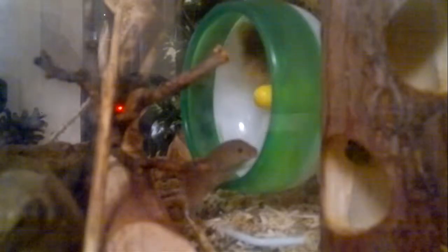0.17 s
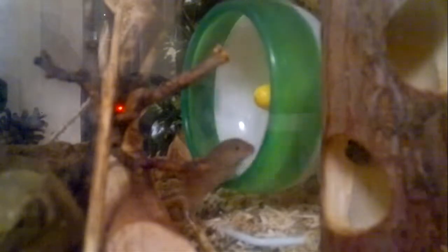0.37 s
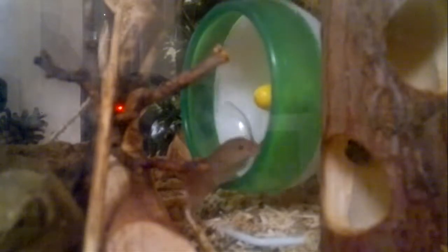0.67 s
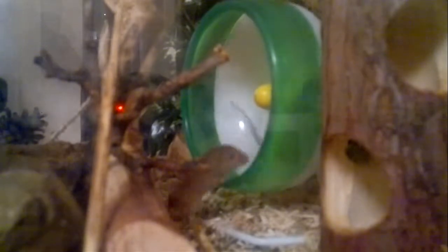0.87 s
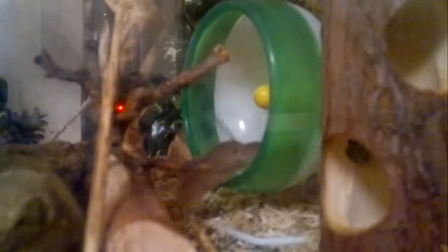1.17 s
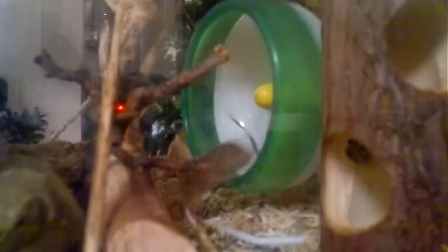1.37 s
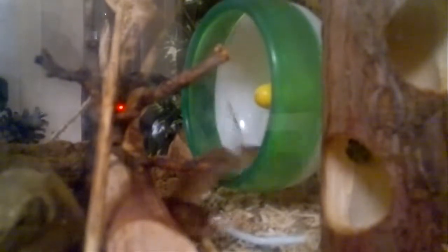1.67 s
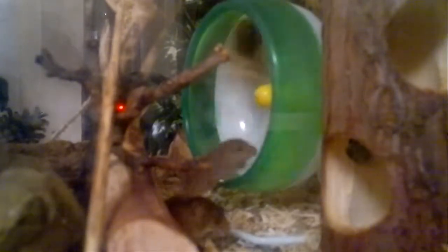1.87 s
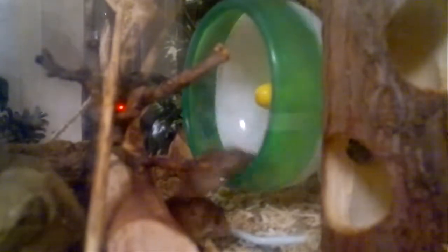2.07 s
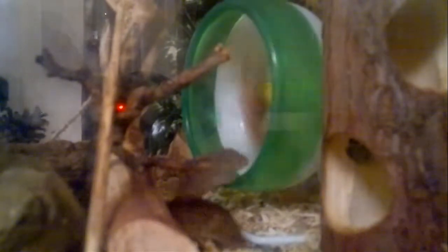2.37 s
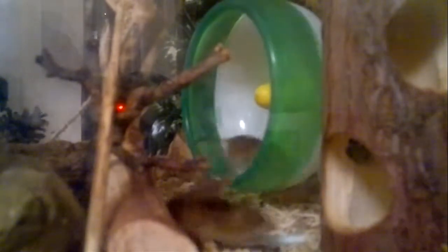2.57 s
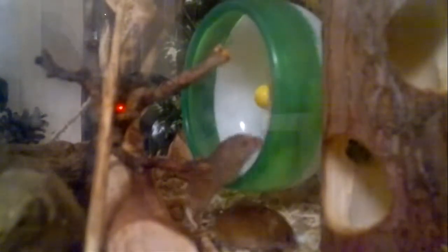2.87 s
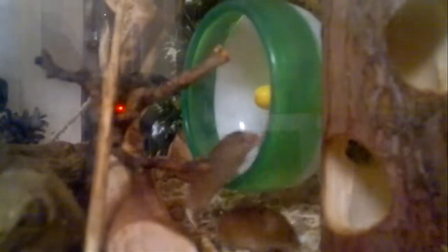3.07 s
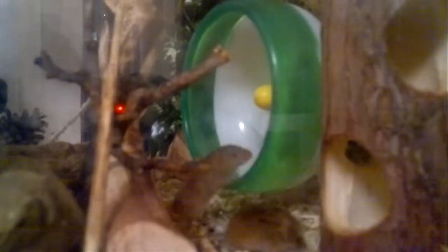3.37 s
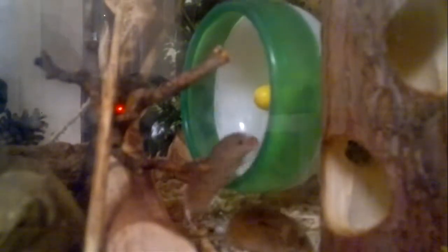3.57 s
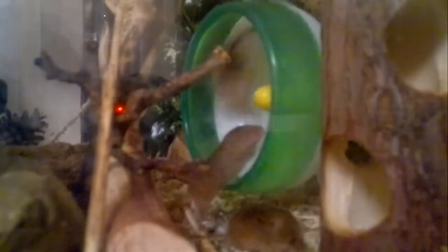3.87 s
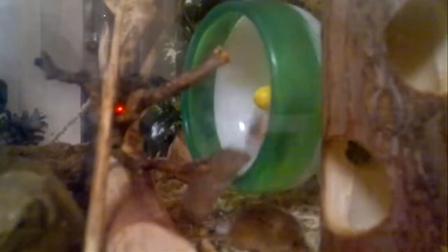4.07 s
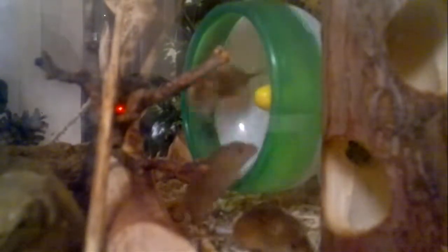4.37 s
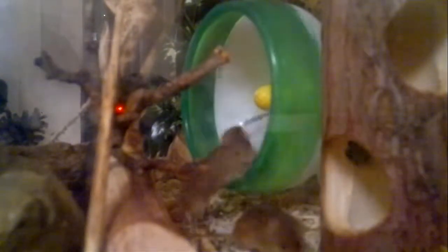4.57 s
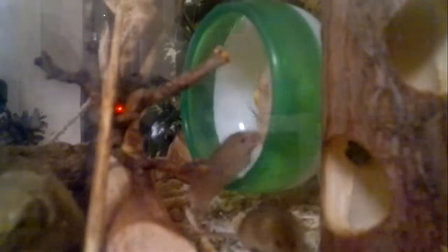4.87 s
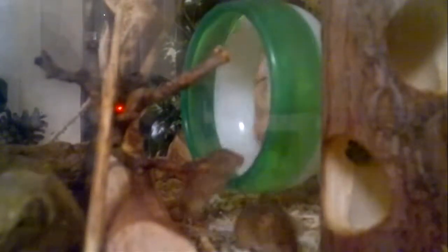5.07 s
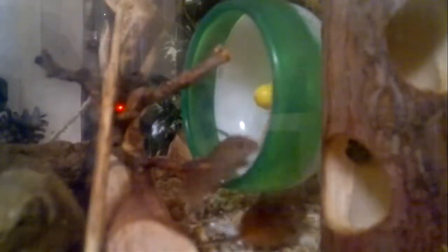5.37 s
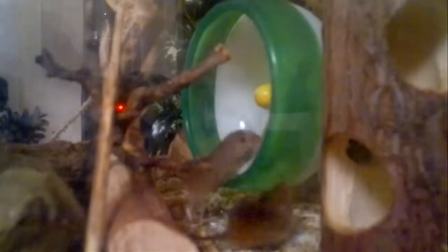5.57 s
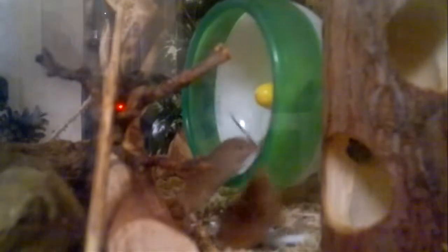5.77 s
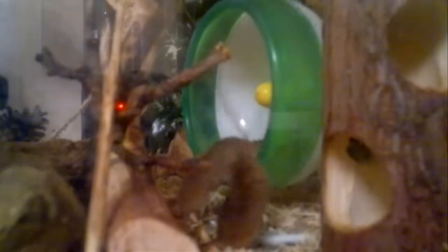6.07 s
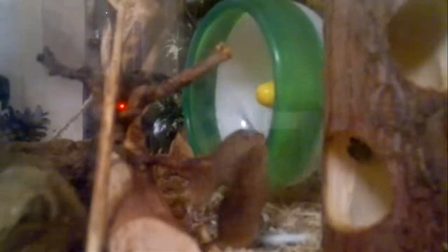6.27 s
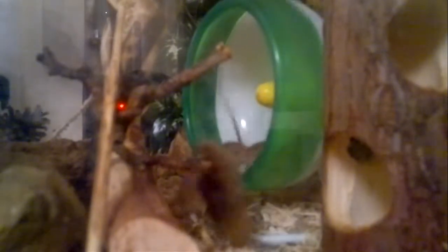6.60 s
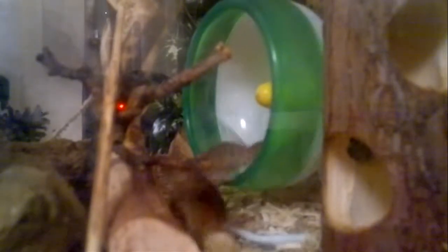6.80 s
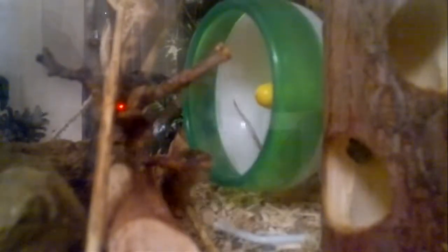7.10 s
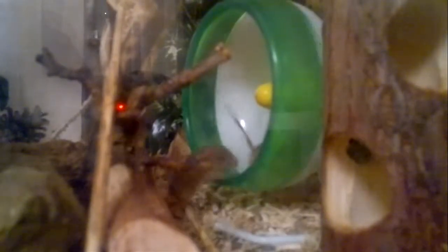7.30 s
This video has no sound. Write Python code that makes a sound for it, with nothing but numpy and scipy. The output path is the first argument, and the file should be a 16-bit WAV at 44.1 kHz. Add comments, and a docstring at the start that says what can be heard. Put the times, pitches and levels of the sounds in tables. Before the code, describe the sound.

A plastic exercise wheel knocks irregularly on its stand as mice scurry around a tank, with muffled patter, low rumble and faint hiss indoors.

```python
"""Mice scramble in and around a plastic exercise wheel in a glass tank, indoors.
Throughout: faint hiss with flickering treble, uneven low rumble, pattering feet; all filtered noise.
Weight shifts add dull low swings; the wheel soon knocks on its stand, often two or three times quickly:
noisy ticks, a short shudder of plastic modes, a low thump of floor modes.
Later come faint rustles, a right-hand buzz of chattering noise after some knocks, and a hollow plop."""
import sys
import numpy as np
from scipy import signal
from scipy.fft import rfft, irfft
from scipy.io import wavfile
from scipy.ndimage import uniform_filter1d

SR = 44100
rng = np.random.default_rng(int(sys.argv[2]) if len(sys.argv) > 2 else 0)


def unload_audio(sound):
    """Save the sound as a 16-bit wav file, at the path given as the first command line argument."""
    columns = np.transpose(np.atleast_2d(sound))
    # keep every value between -1 and 1, then stretch to whole-number steps
    steps = np.round(np.clip(columns, -1, 1) * 32767)
    wavfile.write(sys.argv[1], SR, steps.astype(np.int16))


N = 328104
RING_COUNT = 2 ** 14  # samples per knock response

# Mouse activity as patter level. Each row: time [s], relative level [dB].
ACTIVITY = [(0.0, -59), (0.72, -59.5), (0.97, -61.5), (1.2, -64.5), (1.74, -59), (2.59, -64), (2.76, -64),
            (3.04, -65.5), (3.71, -60.5), (4.29, -63), (4.76, -61.5), (5.1, -65.5), (5.53, -61),
            (5.72, -57.5), (5.99, -62), (6.28, -64), (6.53, -54.5), (7.44, -56.5)]
# Heaviest weight shifts. Each row: centre [s], relative level [dB], half length to 1/e [s].
BUMPS = [(0.012, -34.5, 0.014), (0.146, -36, 0.011), (0.29, -40, 0.028), (0.48, -34.5, 0.048),
         (0.737, -36.5, 0.031), (1.275, -38, 0.023), (1.54, -40.5, 0.035), (1.61, -34.5, .014),
         (1.751, -39, 0.015), (1.989, -43, 0.022), (2.37, -38.5, .018), (2.479, -35.5, 0.04),
         (2.579, -35, 0.029), (3.041, -36.5, 0.023), (3.36, -39.5, 0.021), (3.71, -36, 0.039),
         (3.895, -30.5, 0.038), (4.414, -36.5, 0.019), (4.489, -39, .018), (4.756, -35.5, 0.015),
         (4.858, -33, 0.021), (4.948, -39, 0.029), (5.314, -36, .016), (5.5, -34, 0.016),
         (5.629, -34, 0.072), (5.86, -41.5, 0.033), (6.103, -38, .014), (6.211, -40.5, 0.029),
         (6.35, -42, 0.067), (6.66, -39.5, 0.023), (6.829, -38, 0.016), (7.189, -37, 0.017),
         (7.413, -31.5, 0.028)]
# Wheel against stand. Each row: start [s], relative strike level [dB], relative thump level [dB],
# extra treble tilt [dB], list of relative strike levels of the rebounds [dB].
KNOCKS = [(0.07, -51, -59, -9, [-49.5]), (0.243, -60.5, -54.5, 0, []), (0.384, -43, -50, -1.5, []),
          (0.505, -42.5, -45, -2.5, [-34]), (0.722, -41.5, -41.5, -0.5, [-36]),
          (0.863, -44.5, -56.5, -5.5, []), (1.263, -54, -52.5, -9, []), (1.314, -31, -31.5, -1, []),
          (1.614, -41.5, -45, -1, [-35.5]), (1.831, -41, -45.5, -1, []), (2.057, -32.5, -31, 0, [-34.5]),
          (2.223, -46, -51, -0.5, []), (2.425, -36.5, -33.5, 2, []), (2.466, -27, -29.5, -3.5, [-29]),
          (2.565, -41, -51, -7.5, []), (3.005, -49.5, -52, -10, []), (3.251, -41, -49.5, -0.5, [-48.5]),
          (3.464, -36, -38.5, 0.5, [-32.5, -40.5]), (3.818, -55, -53, -7, []),
          (3.858, -33.5, -36.5, 0, [-31.5]), (4.532, -56.5, -68, -9, [-49.5]), (4.774, -35, -33, 1, [-28]),
          (5.632, -45, -41.5, -2, []), (5.671, -32.5, -34.5, -1, []), (5.774, -37.5, -43.5, 0, []),
          (5.944, -48, -50, -1, []), (6.41, -46, -48.5, -4, []), (6.481, -43, -55, -2.5, []),
          (6.521, -28.5, -26.5, -1, [-28]), (6.885, -43.5, -47.5, -4, []), (7.051, -33.5, -36.5, -0.5, []),
          (7.185, -58, -53, 4, []), (7.282, -47, -47.5, -4, [])]
# Tank floor under the stand. Each row: mode frequency [Hz], relative left and right levels [dB].
THUMP_MODES = [(129, -15.5, -14.5), (158, -7, -8.5), (184.5, -9.5, -12.5), (213.94, 3, -1)]


def from_db(db):
    """Decibels to amplitude gain."""
    return 10 ** (np.asarray(db) / 20)


def rms_one(x):
    """Scale to unit rms."""
    return x / np.sqrt(np.mean(x ** 2) + 1e-20)


def sides(left_db, right_db):
    """Column of left and right gains."""
    return from_db([[left_db], [right_db]])


def add(out, start_s, sound):
    """Mix a sound in at a time, cut at the end of the output."""
    start = max(round(start_s * SR), 0)
    out[:, start:start + sound.shape[-1]] += sound[:, :out.shape[-1] - start]


def step(t, at_s, width_s):
    """Smooth tanh rise from 0 to 1, half way at at_s."""
    return .5 + .5 * np.tanh((t - at_s) / width_s)


def level(curve):
    """dB curve as a gain per sample."""
    return from_db(np.interp(np.arange(N) / SR, *np.transpose(curve)))


def swells(rows):
    """Sum of Gaussian swells; rows of centre s, level dB, half length s."""
    t = np.arange(N) / SR
    total = 0
    for centre_s, level_db, half_length_s in rows:
        exponent = np.minimum(((t - centre_s) / half_length_s) ** 2, 50)
        total = total + from_db(level_db) * np.exp(-exponent)
    return total


def gains(spectrum, size):
    """Spectrum in dB, interpolated over log frequency, as a gain per FFT bin."""
    hz, db = np.transpose(spectrum)
    bin_hz = np.maximum(np.fft.rfftfreq(size, 1 / SR), 1)
    return from_db(np.interp(np.log(bin_hz), np.log(hz), db))


def causal(x, gain):
    """Minimum-phase filter built by folding the cepstrum: no sound before its cause."""
    size = x.shape[-1]
    cepstrum = irfft(np.log(gain), size)
    cepstrum[1:size // 2] *= 2
    cepstrum[size // 2 + 1:] = 0
    return irfft(rfft(x) * np.exp(rfft(cepstrum)), size)


def colour(x, spectrum):
    """Shape a spectrum while keeping the power of white noise."""
    return causal(x, rms_one(gains(spectrum, x.shape[-1])))


def noise(spectrum, size):
    """Mono noise of about unit rms with the given spectrum."""
    return colour(rng.standard_normal(size), spectrum)


def white_pair(alike, size):
    """Two white channels sharing the fraction alike of their power."""
    alike = np.clip(alike, 0, 1)
    shared = np.sqrt(alike) * rng.standard_normal(size)
    return shared + np.sqrt(1 - alike) * rng.standard_normal((2, size))


def modes(table, t):
    """Sum of undamped sine modes, each with its own left and right level."""
    hz, *level_db = np.transpose(table)
    return from_db(level_db) @ np.sin(2 * np.pi * hz[:, None] * t)


def hiss(flicker_hz=6.6, flicker_start_s=0.02, wander_rad=1.0):
    """Steady hiss plus faint treble pulsing with wandering phase and strength."""
    # Each row: frequency [Hz], relative density [dB per Hz].
    hiss_spectrum, flicker_spectrum = [(20, 24.5), (90, 22), (380, 11.5), (480, 13.5), (1200, 6.5),
                                       (2000, 2), (4800, -1.5), (7000, -4.5), (11000, -6.5), (15500, -12)], [(6800, -47), (7700, 6.5), (8300, 3.5), (9300, -16),
                                                     (10700, 5), (11800, -25), (15000, -19.5)]
    t = np.arange(N) / SR
    late, strength = [np.interp(t * flicker_hz, np.arange(64), row) for row in rng.standard_normal((2, 64))]
    phase = 2 * np.pi * flicker_hz * (t - flicker_start_s) + wander_rad * late
    pulses = (.5 + .5 * np.cos(phase)) ** 2
    steady = sides(-67.5, -68.5) * colour(white_pair(alike=0.02, size=N), hiss_spectrum)
    flicker = noise(flicker_spectrum, N) * pulses * from_db(2 * strength)
    return steady + sides(-86.5, -95.5) * flicker


def lumps(per_s):
    """Random swing: uniform points of unit spread, joined by straight lines."""
    count = 256
    points = rng.uniform(-np.sqrt(3), np.sqrt(3), count)
    return np.interp(np.arange(N) / SR * per_s, np.arange(count), points)


def shaken(t60_s, rise_s=.005):
    """Motion envelope after every knock, scaled by its thump level and dying away."""
    out, t = np.zeros((1, N)), np.arange(RING_COUNT) / SR
    shape = (1 - np.exp(-t / rise_s)) * from_db(-60 * t / t60_s)
    for start_s, _, thump_db, _, _ in KNOCKS:
        add(out, start_s, from_db(thump_db) * shape[None])
    return out[0]


def rumble(bed_db=-54.5, activity_exponent=0.89, lumpy_db=6, lumps_per_s=22, bump_noise_db=-8):
    """Low noise follows activity, knock sway and bumps; tonal bumps join it, almost all on the left."""
    # Each row: frequency [Hz], relative density [dB per Hz].
    rumble_spectrum = [(10, -37.5), (25, -18), (40, 2), (50, 6.5), (62, 1), (80, -11), (110, -14),
                       (160, -21.5), (300, -70.5)]
    low = noise(rumble_spectrum, N)
    even = low / np.sqrt(uniform_filter1d(low ** 2, size=SR // 12) + 1e-6)  # short-term level evened out
    activity = rms_one(level(ACTIVITY)) ** activity_exponent
    bed = from_db(bed_db + lumpy_db * lumps(lumps_per_s)) * activity
    sway = from_db(-11.5) * shaken(t60_s=0.35) + from_db(bump_noise_db) * swells(BUMPS)
    return sides(6.1, -29.0) * (np.hypot(bed, sway) * even + bumps())


def bumps(bump_db=-3, centre_hz=48.8, spread_hz=8):
    """Each weight shift is a short low sine swing of the tank, random in detuning and phase."""
    t = np.arange(N) / SR
    chance = rng.uniform(-1, 1, (len(BUMPS), 2))
    total = 0
    for bump, (detune, turn) in zip(BUMPS, chance):
        hz = centre_hz + spread_hz * detune
        total = total + swells([bump]) * np.sin(2 * np.pi * hz * (t - bump[0]) + np.pi * turn)
    return from_db(bump_db) * total


def feet(steps_per_s=45, step_db=26, rubbing_db=-2, roll_db=-14.5):
    """Random step impulses and rubbing noise through the tank floor, scaled by activity, scuffs and rolling."""
    # Each row: frequency [Hz], relative density [dB per Hz].
    patter_spectrum = [(60, -17.5), (95, 3), (150, -2.5), (215, 2), (300, -3.5), (390, -6), (460, -19.5),
                       (820, -20), (1400, -36.5), (3000, -59.5)]
    # A mouse scuffs along the wheel. Each row: centre [s], relative level [dB], half length to 1/e [s].
    scuff_rows = [(1.26, -54.5, 0.025), (2.037, -46, 0.021), (2.979, -58.5, 0.016), (3.662, -50.5, 0.04),
                  (4.084, -61, 0.038), (4.33, -65, 0.038), (4.493, -59.5, 0.012), (5.55, -54, 0.033),
                  (6.194, -57.5, 0.032), (6.34, -59, 0.063), (7.051, -49, 0.045)]
    effort = level(ACTIVITY) + swells(scuff_rows) + from_db(roll_db) * shaken(t60_s=0.35)
    steps = (rng.random(N) < steps_per_s / SR) * rng.uniform(-1.45, 1.3, N)
    force = from_db(step_db) * steps + from_db(rubbing_db) * white_pair(alike=0.95, size=N)
    return sides(2.22, -3.05) * effort * colour(force, patter_spectrum)


def held(t, hold_s, fade_s, hold_t60_s, tail_db, tail_t60_s):
    """Envelope: decays while the wheel presses on the stand, then lets go, over a decaying tail."""
    pressed = (1 - step(t, hold_s, fade_s)) * from_db(-60 * t / hold_t60_s)
    return pressed + from_db(tail_db - 60 * t / tail_t60_s)


def contacts(t, click_db=12.5, grit_db=-3, grit_t60_s=0.044):
    """Every bounce is a click with a short gritty wake."""
    # Bounces on the stand. Each row: time after the knock [s], relative left and right levels [dB].
    bounce_rows = [(0.001, 1.5, -13.5), (0.0038, -2.5, -24), (0.012, -17.5, -14), (0.017, 0.5, -11),
                   (0.0238, -21.5, -23.5)]
    # One contact. Each row: frequency [Hz], relative density [dB per Hz].
    tick_spectrum = [(200, 0.5), (500, -2.5), (900, 15), (1300, 6.5), (1550, -3), (2300, 2), (3300, -3),
                     (5000, -9), (6700, -19.5), (8000, -53), (14000, -56)]
    force = np.zeros((2, RING_COUNT))
    brief = t[:SR // 25]
    grit_decay = from_db(grit_db - 60 * brief / grit_t60_s)
    click = from_db(click_db) * (brief == 0)
    for after_s, left_db, right_db in bounce_rows:
        grit = white_pair(alike=0.74, size=len(brief)) * grit_decay
        add(force, after_s, sides(left_db, right_db) * (grit - click))
    return colour(force, tick_spectrum)


def wheel_ring(t, start_s=0.000927):
    """The plastic's modes start together, about at the first contact."""
    # Wheel and stand. Each row: mode frequency [Hz], relative left and right levels [dB].
    wheel_modes = [(289, 1.5, 5), (344.5, -4, 0.5), (408, -12.5, -6.5), (475, -14, -18.5),
                   (530, -21.5, -15.5), (587, -1.5, 0), (642, -3.5, -5), (729.5, 1, 0), (815, -11, -10),
                   (869, -0.5, -0.5), (953.5, -7, -22), (1024, -12, -5), (1063, -6, -5), (1132, -13.5, -9),
                   (1180, -4, -14.5), (1271, -6, -12.5), (1618, -22.5, -2.5), (1686, -9.5, -37),
                   (1727, -2, -27), (1984, -10, -34), (2275, -4, -16), (2960, -12, -11)]
    since_s = np.maximum(t - start_s, 0)
    shape = held(t, hold_s=0.023, fade_s=0.0014, hold_t60_s=0.45, tail_db=-10.5, tail_t60_s=0.29)
    return -sides(-15.5, -18.5) * modes(wheel_modes, since_s) * shape


def wheel_response(t, ring):
    """One knock before scaling: bounces, ringing modes, dense noise shudder and faint tank aftersound."""
    # Dense ring between modes, and what lingers. Each row: frequency [Hz], relative density [dB per Hz].
    shudder_spectrum, aftersound_spectrum = [(120, 8), (250, 4), (450, 0.5), (900, 1), (1300, -6),
                                             (1480, -16.5), (1750, -14), (2600, -16), (3100, -20),
                                             (3800, -26.5), (5000, -36), (8000, -64)], [(400, -4), (750, -7), (1250, 2),
                                                              (1500, -14.5), (2400, 1), (4500, -37)]
    shape = held(t, hold_s=0.037, fade_s=0.0028, hold_t60_s=0.36, tail_db=-2.5, tail_t60_s=0.27)
    shaking = step(t, 0.0015, 0.0023) * shape
    shudder = colour(shaking * white_pair(alike=0.76, size=RING_COUNT), shudder_spectrum)
    lingering = step(t, 0.022, 0.018) * from_db(-31.0 - 60 * t / 0.43)
    aftersound = colour(lingering * white_pair(alike=0.59, size=RING_COUNT), aftersound_spectrum)
    return ring + sides(-11.5, -12.0) * shudder + aftersound + from_db(-6.5) * contacts(t)


def strike(t, ring, peak_db, treble_db, treble_per_db=0.5, full_treble_db=-33):
    """Fresh wheel response at a given force; soft blows lose treble."""
    # Each row: frequency [Hz], gain per dB of treble tilt [dB per dB].
    softness = [(1250, 0), (1550, 0.94), (2600, 1.5), (3300, 3), (7000, 5)]
    tilt_db = treble_per_db * (peak_db - full_treble_db) + treble_db
    tilt_gain = gains(softness, RING_COUNT) ** tilt_db
    return from_db(peak_db + 1.0) * causal(wheel_response(t, ring), tilt_gain)


def thump_response(t):
    """Tank floor modes: a decaying part plus one that grows until about 47 ms, then is damped."""
    gate = step(t, 0.0047, 0.00067) * (1 - step(t, 0.047, 0.0055))
    swell = gate * from_db(t * 93)  # grows 93 dB per s
    return modes(THUMP_MODES, t) * (swell + from_db(-5.0 - 60 * t / 0.42))


def rebounds(hard_db=-34, soft_db=-41, hard_delay_s=0.0385, soft_delay_s=0.041):
    """Yield start s and level dB as the wheel rocks back, a little sooner after a hard blow."""
    for start_s, peak_db, _, _, later in KNOCKS:
        for next_db in later:
            start_s = start_s + np.interp(peak_db, [soft_db, hard_db], [soft_delay_s, hard_delay_s])
            peak_db = next_db
            yield start_s, peak_db


def knocks(rebound_treble_db=-4, rebound_thump_db=-2.5, rebound_thump_t60_s=0.21):
    """Each knock swells into a thump; rebounds are damped, with a short thump."""
    # Each row: time after the rebound [s], gain [dB].
    rebound_damping = [(0, 0.5), (0.006, 1.5), (0.025, -3), (0.06, -1.5)]
    out, t = np.zeros((2, N)), np.arange(RING_COUNT) / SR
    ring, thump = wheel_ring(t), thump_response(t)
    for start_s, peak_db, thump_db, treble_db, _ in KNOCKS:
        add(out, start_s, strike(t, ring, peak_db, treble_db) + from_db(thump_db - 6) * thump)
    damping = from_db(np.interp(t, *np.transpose(rebound_damping)))
    short_thump = modes(THUMP_MODES, t) * from_db(rebound_thump_db - 60 * t / rebound_thump_t60_s)
    for start_s, peak_db in rebounds():
        blow = damping * strike(t, ring, peak_db, rebound_treble_db)
        add(out, start_s, blow + from_db(peak_db - 5.5) * short_thump)
    return out


def rustles(half_length_s=0.02):
    """Short dry brushes of fur on wood shavings: noise under Gaussian swells."""
    # Each row: centre [s], level [dB].
    rustle_rows = [(0.899, -81), (1.41, -76), (4.05, -79), (6.97, -75.5), (7.23, -76.5)]
    # Each row: frequency [Hz], relative density [dB per Hz].
    rustle_spectrum = [(2500, -24), (3800, -1), (4700, 2), (5600, -16), (8000, -17)]
    t = np.arange(N) / SR
    swell = sum(from_db(db) * np.exp(-((t - s) / half_length_s) ** 2) for s, db in rustle_rows)
    return swell * colour(white_pair(alike=.4, size=N), rustle_spectrum)


def buzzes(chatter_hz=140, depth=0.13):
    """A loose part on the right chatters shortly after a blow: noise with amplitude modulation."""
    # Each row: start [s], relative level [dB].
    buzz_rows = [(1.315, -44), (2.057, -47.5), (2.425, -57), (2.468, -42), (2.502, -54.5), (3.857, -51),
                 (4.813, -48), (5.672, -47), (6.523, -36.5), (6.549, -41.5), (7.051, -58.5)]
    # Each row: frequency [Hz], relative density [dB per Hz].
    buzz_spectrum = [(1100, -27.5), (1700, 9), (2100, -11), (2700, -5.5), (3100, 7), (3900, 4), (4300, -10),
                     (4750, -12), (5300, -50)]
    out, t = np.zeros((2, N)), np.arange(RING_COUNT) / SR
    fall = 1 - step(t, 0.033, 0.006) + from_db(-7.5 - 60 * t / 0.22)
    shape = step(t, 0.014, 0.003) * fall
    chatter = 1 + depth * np.cos(2 * np.pi * chatter_hz * (t - .016))
    for start_s, level_db in buzz_rows:
        grit = colour(shape * chatter * white_pair(alike=0.5, size=RING_COUNT), buzz_spectrum)
        add(out, start_s, from_db(level_db) * sides(-31, 0) * grit)
    return out


def plops(half_length_s=0.0018):
    """A soft hollow pitch: a few cosine cycles under a Gaussian, mostly on the left."""
    # Each row: centre [s], pitch [Hz], relative level [dB].
    plop_rows = [(6.6452, 398, -27)]
    t = np.arange(N) / SR
    total = 0
    for centre_s, hz, level_db in plop_rows:
        shape = from_db(level_db) * np.exp(-((t - centre_s) / half_length_s) ** 2)
        total = total + shape * np.cos(2 * np.pi * hz * (t - centre_s))
    return sides(3.0, -21) * total


def scene():
    """Sum of all layers; knocks reach the right side a little later."""
    wheel = knocks()
    wheel[1] = np.roll(wheel[1], 4)  # samples
    return hiss() + rumble() + feet() + wheel + rustles() + buzzes() + plops()


def record(dry, cutoff_hz=15700):
    """Steep elliptic low-pass."""
    return signal.sosfilt(signal.ellip(12, .1, 80, cutoff_hz, fs=SR, output="sos"), dry)


dry = scene()
out = record(dry)
unload_audio(out)
```